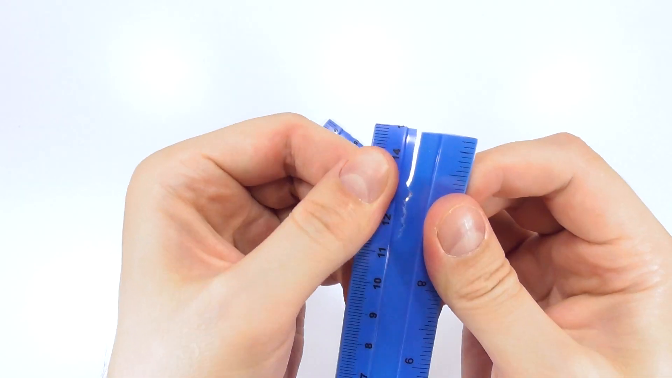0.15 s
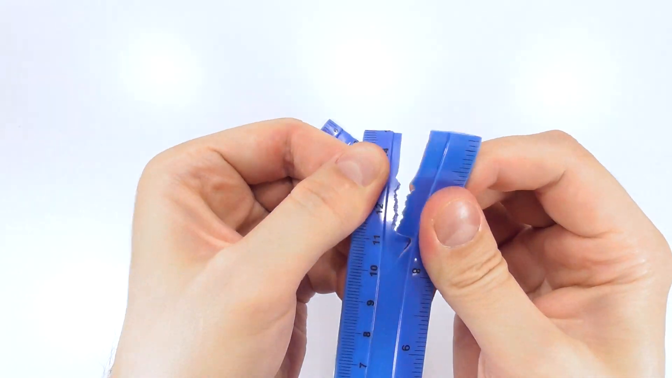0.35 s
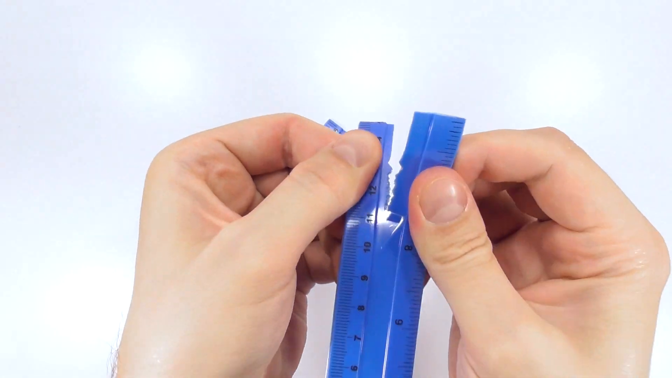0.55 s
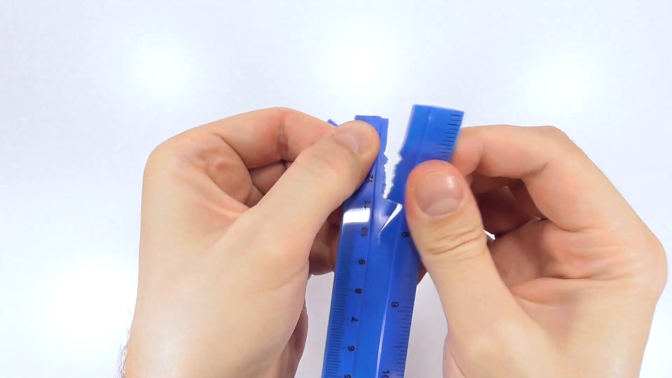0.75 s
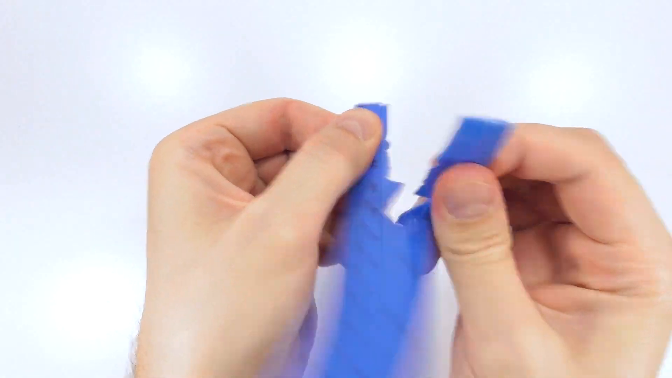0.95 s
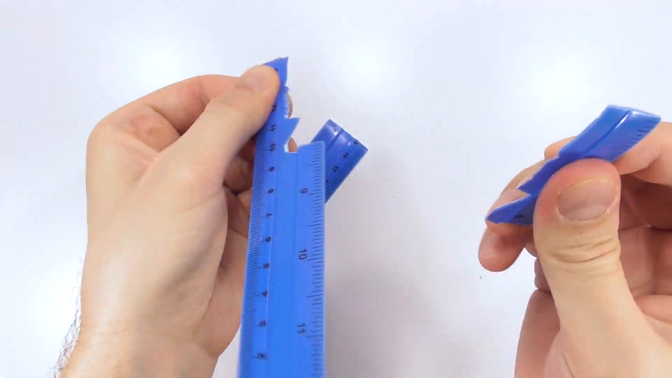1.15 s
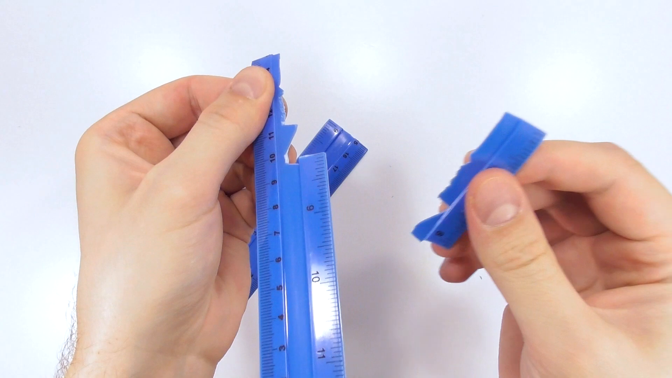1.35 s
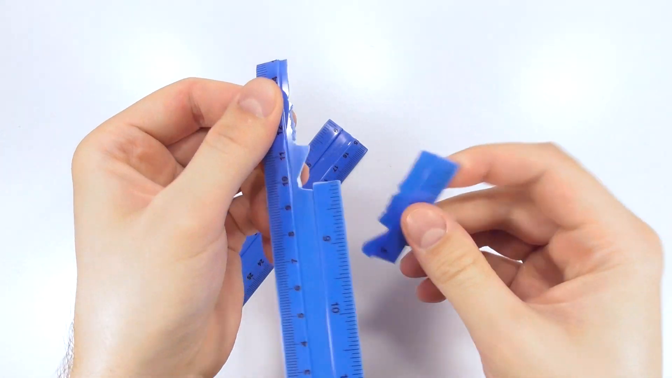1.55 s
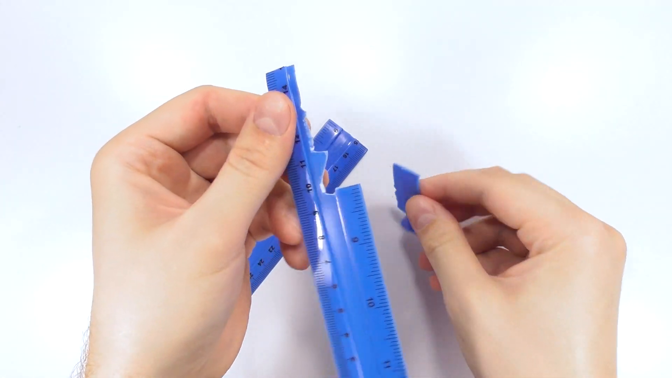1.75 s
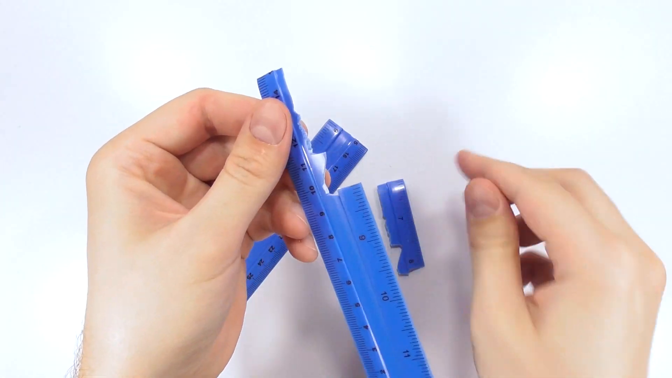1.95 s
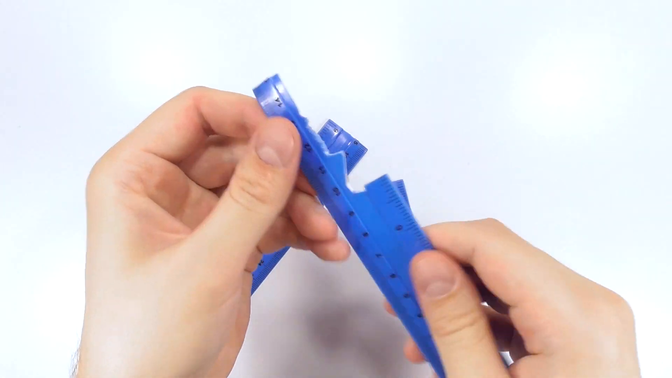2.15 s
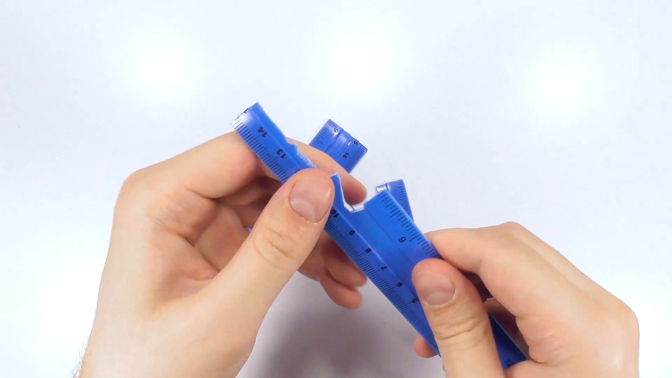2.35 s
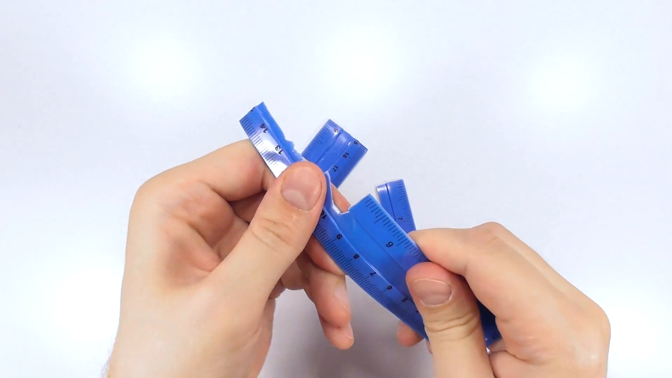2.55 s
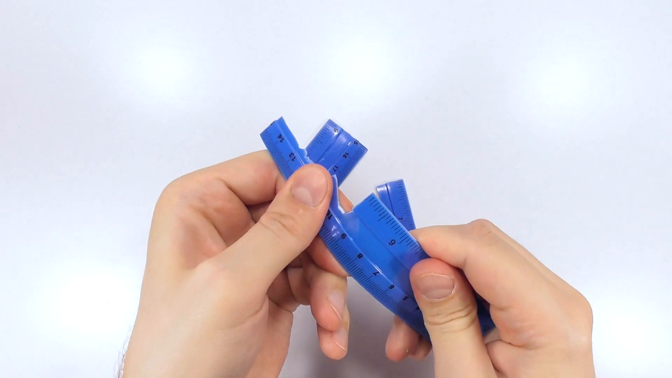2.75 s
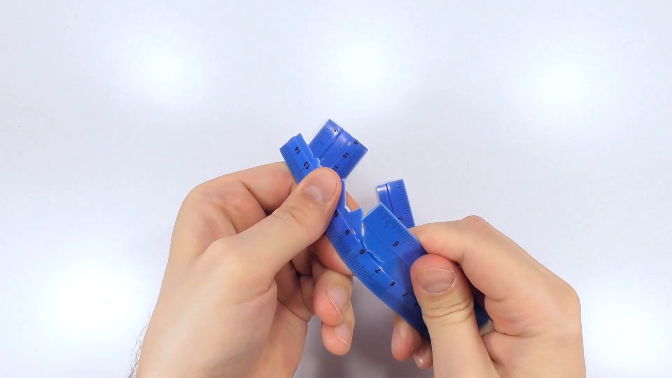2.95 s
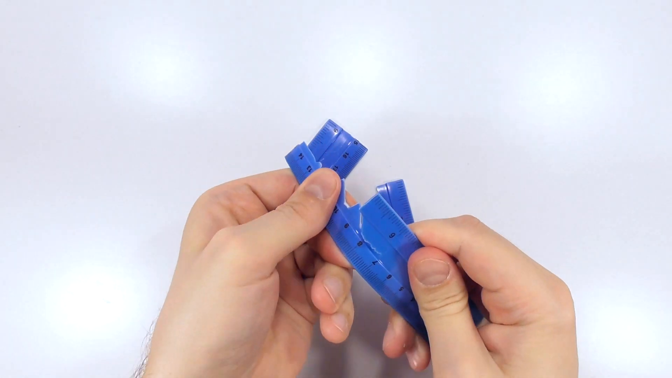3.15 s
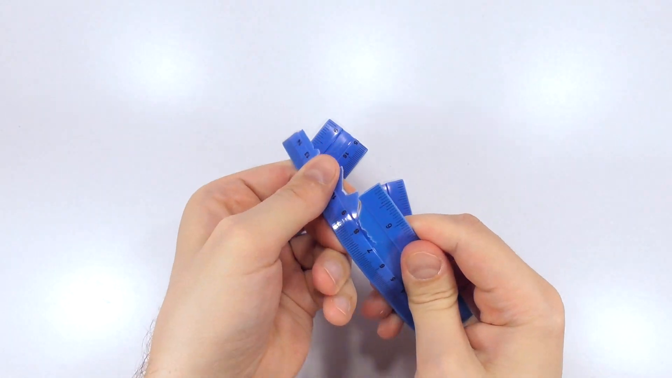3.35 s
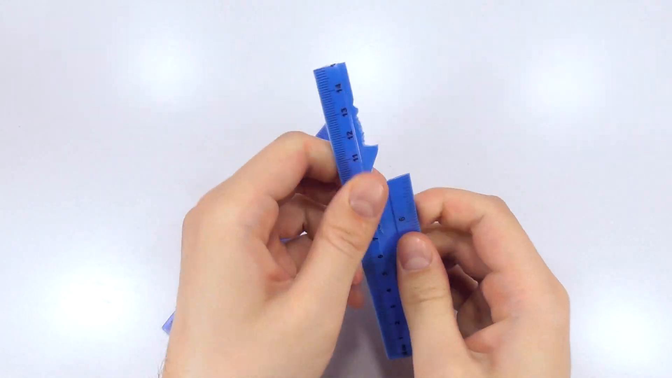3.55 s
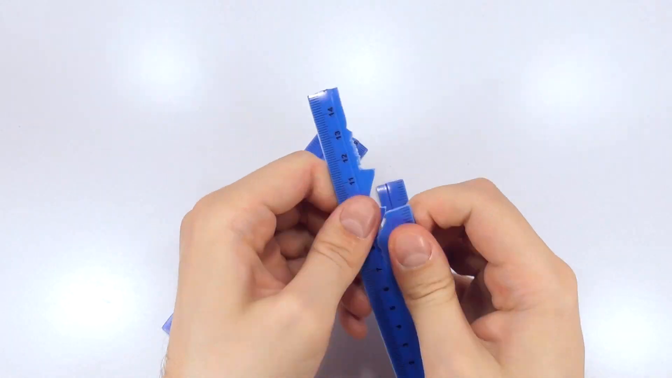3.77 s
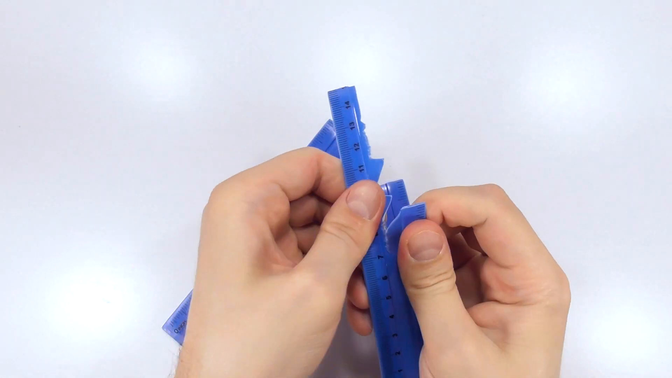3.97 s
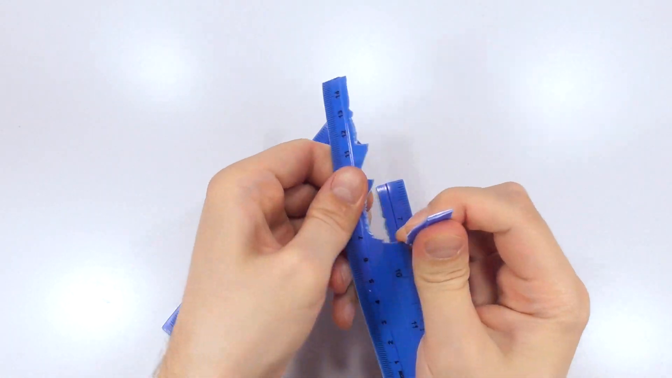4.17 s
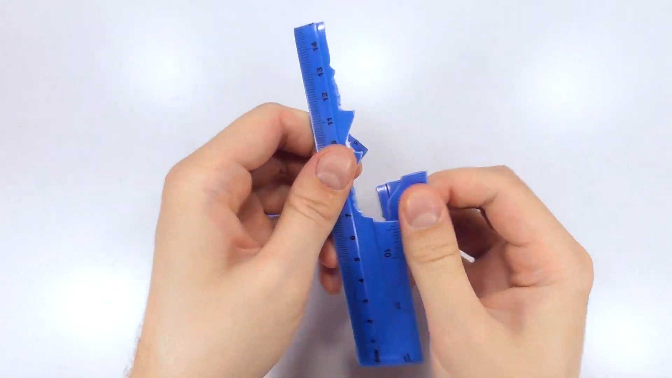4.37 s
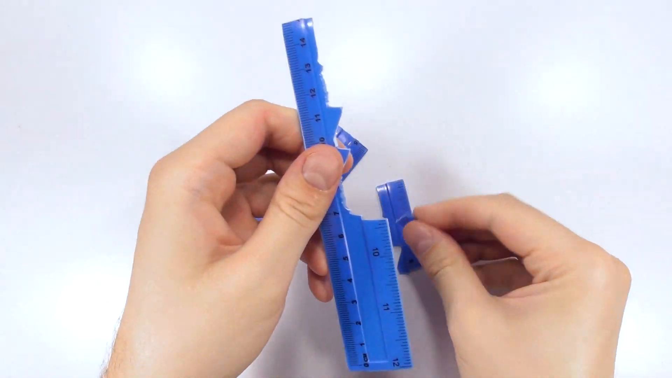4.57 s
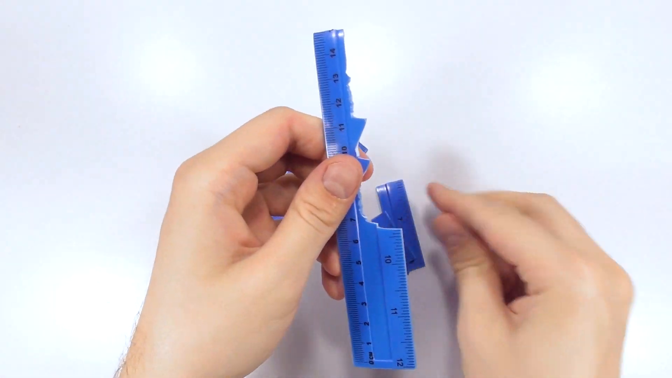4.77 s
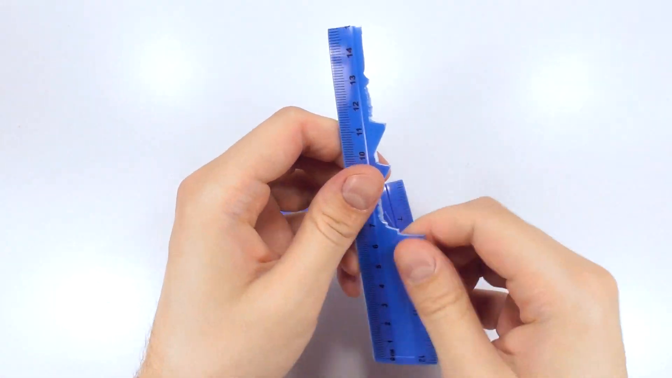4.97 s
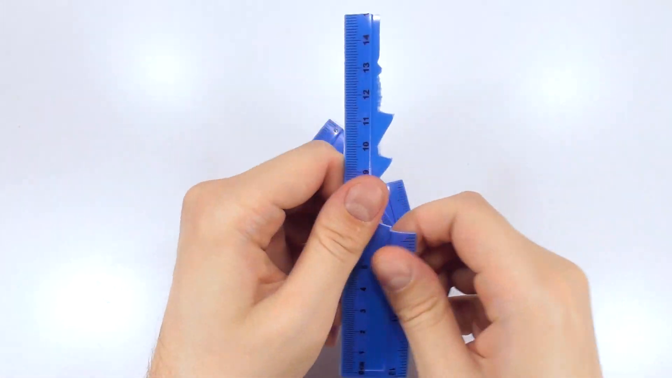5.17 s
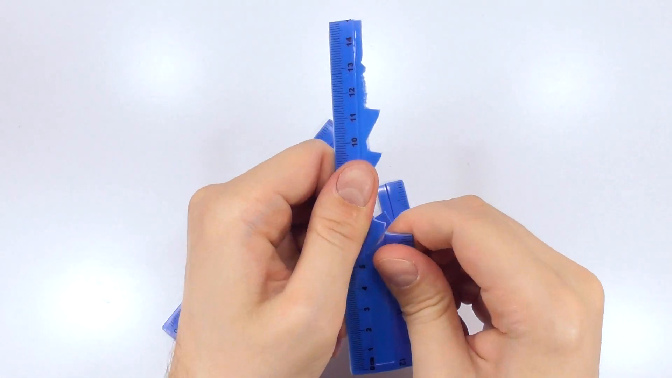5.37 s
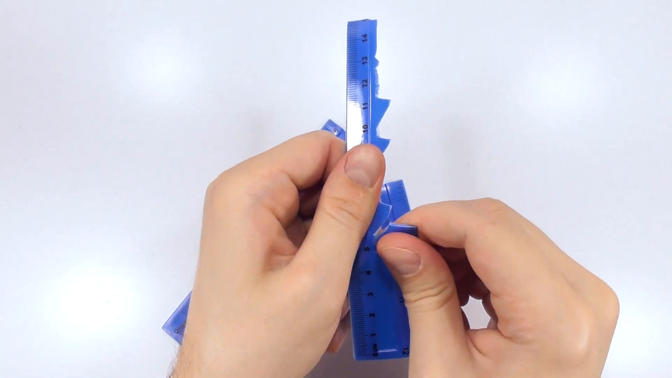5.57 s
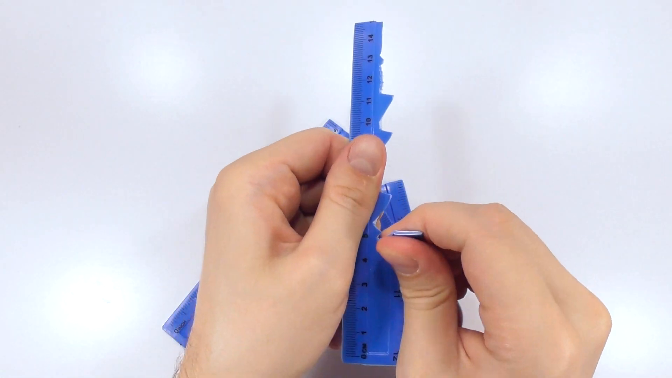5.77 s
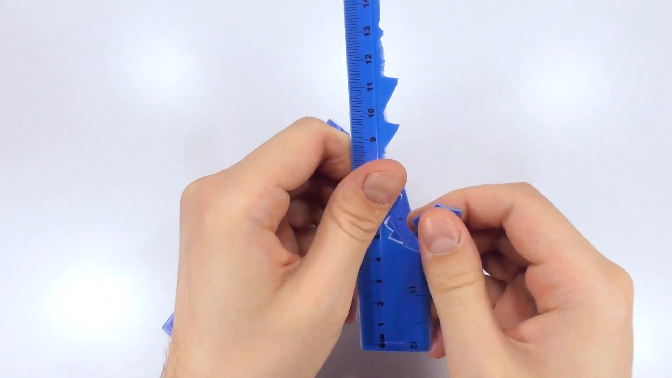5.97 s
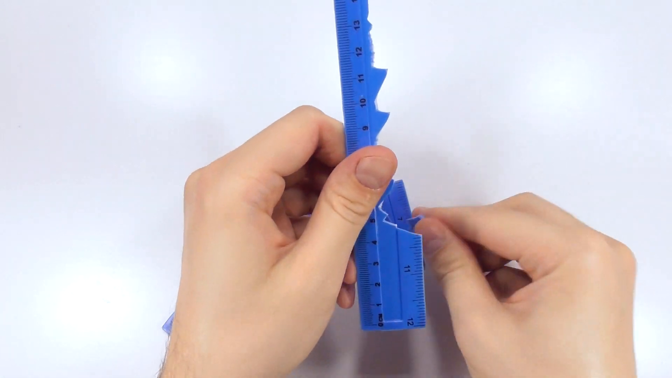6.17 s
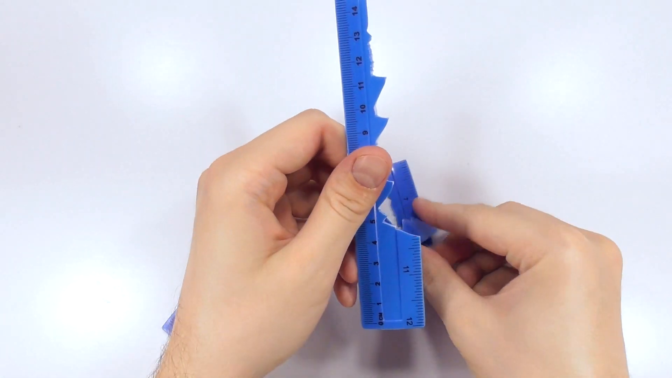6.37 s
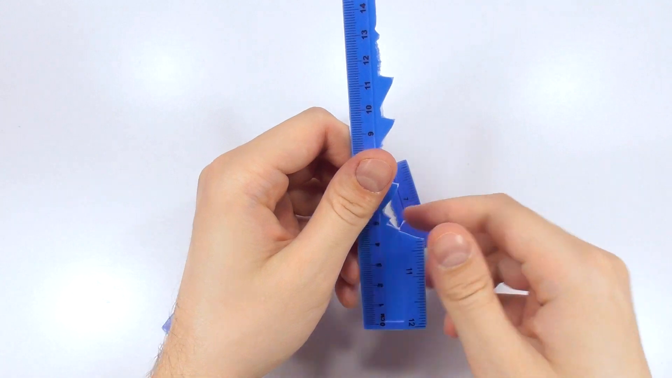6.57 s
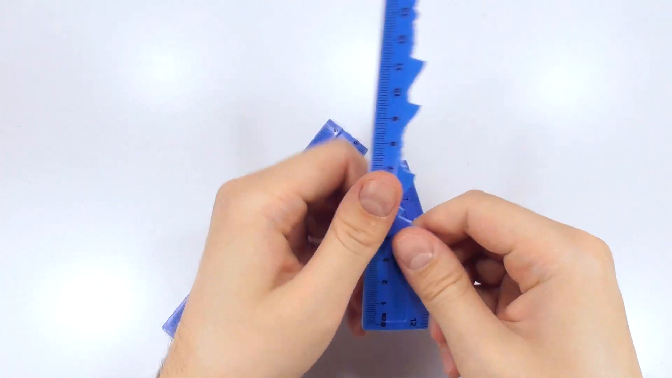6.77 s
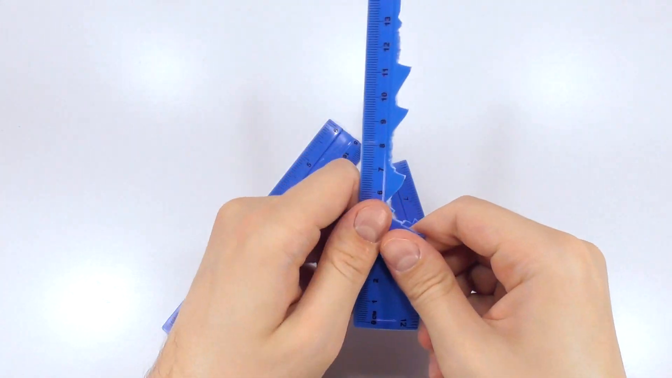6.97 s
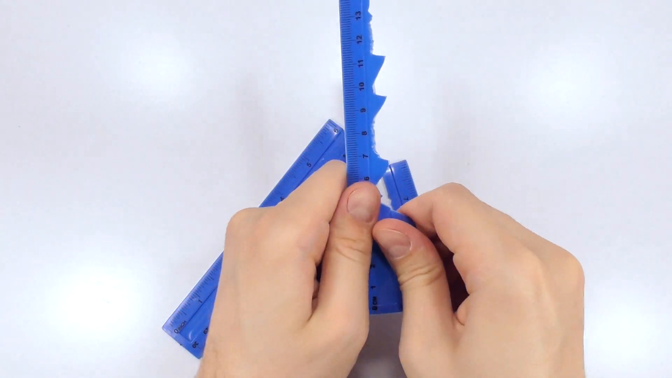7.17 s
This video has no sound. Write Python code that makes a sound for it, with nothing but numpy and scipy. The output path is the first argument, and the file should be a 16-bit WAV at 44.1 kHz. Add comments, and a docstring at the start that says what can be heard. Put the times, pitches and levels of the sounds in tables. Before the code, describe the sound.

A quiet small room with low fan hum and soft air noise, heard through a close stereo microphone. A plastic ruler breaks with dry, bright, overloading cracks at about 0.36, 0.78 and 0.96 s, the last strongest, followed at once by a sharp tick and dull low knocks near 1.0 s. Each crack carries a short puff of air and a brief diffuse room tail; the hum drops away, then swells back. Around 1.8 s a piece is set down with a woody judder, and a shard clicks and bounces. Faint ticks and finger rubs lead to a crack at 2.9 s, then gripping strokes near 3.5 s. A quick double crack comes at 4.05 and 4.09 s; tiny high shards patter at 4.7-4.8 s. Rubbing at 5 s precedes cracks at 5.4 and 5.66 s. Lighter fragments bounce at 6.3-6.45 s, and soft ticks and rubs finish near 7 s.

```python
"""Two hands bend a plastic ruler over a table and snap pieces off it, close to the microphone in a small room.
Each break is a burst of noise through resonances of the strip, with low-passed puffs of air at two ports.
Shards ring and bounce as dying sines, fingers rub as filtered grains, and the bent strip ticks.
Behind them lie coloured air noise and a fan's hum; a diffuse tail of noise answers as the room.
The cracks drive the recorder's gain control down, so the hum sinks and swells back after each."""
import sys
import numpy as np
from scipy import signal
from scipy.fft import rfft, irfft, next_fast_len
from scipy.io import wavfile
from scipy.ndimage import uniform_filter1d, minimum_filter1d

SR = 44100
rng = np.random.default_rng(int(sys.argv[2]) if len(sys.argv) > 2 else 0)


def store_wav(level_fs):
    """Save 16-bit WAV to argv[1]."""
    pcm = np.round(np.clip(np.atleast_2d(level_fs), -1, 1) * 32767)
    wavfile.write(sys.argv[1], SR, pcm.T.astype(np.int16))


N = 318402
AGE = np.arange(SR // 6) / SR   # time since a blow, s
CLICK = (AGE == 0) + 1e-18   # a single-sample impulse

# Room background with a fan's hum: hz [Hz], relative_db [dB]
AIR_COLOUR = [(15, -56), (25, -11.5), (59, -12), (99, -13), (145, 1), (256, -6), (317, -13), (607, -9.5),
              (796, -13), (1160, -16), (1650, -31.5), (2050, -27.5), (5140, -42), (8590, -29.5),
              (16000, -36.5)]
AIR_RMS_DB = -53
# Lines of the fan: hz [Hz], rms_db [dB]
FAN_LINES = [(120, -61), (183, -63), (242, -65), (366, -74), (600, -72), (948, -75), (1147, -70)]
# Likeness of noise at the two ports: hz [Hz], left_right_likeness [0 to 1]
PORT_LIKENESS = [(60, 0.14), (180, 0.89), (550, 0.29), (1650, 0.6), (4970, 0.94), (15000, 0.33)]
# Phase by which the left port leads in the treble: hz [Hz], lead [radians]
PORT_LEAD = [(9000, 0), (11000, .2), (12100, 1.0), (15000, .6)]

# The strained ruler ticks and its broken edges catch; levels before the trims in ticks():
# start_s [s], tick_db [dB], body_knock_db [dB]
TICKS = [(0.0693, -38, -66.5), (.9855, 6.5, -16), (1.4476, -41.5, -77.5), (1.728, -41.5, -70.5),
         (2.1577, -33.5, -54), (2.192, -30.5, -74), (2.4289, -45.5, -43), (3.4734, -31, -86),
         (3.4908, -34.5, -48), (3.6076, -31, -37.5), (4.998, -32.5, -43), (5.2684, -29.5, -44.5),
         (6.094, -33.5, -39.5), (6.6638, -43, -52), (6.682, -32.5, -51.5)]
# Colour of a tick: hz [Hz], relative_db [dB]
TICK_COLOUR = [(400, -20), (1000, -2), (1700, -17.5), (3300, -4), (5000, -15.5), (6500, 0.5), (8500, 3.5),
               (11000, -5), (15500, -5.5)]
# Fainter ticks come at random all the while; levels before the same trims
FAINT_TICKS_PER_S = 4
FAINT_TICK_DB, FAINT_KNOCK_DB, FAINT_SPREAD_DB = -45.5, -61, 1

# The room's answer: hz [Hz], relative_db [dB]
ROOM_COLOUR = [(200, -10.5), (1000, -6.5), (3000, -0.5), (5000, 2), (8000, -1), (10500, -2.5), (13000, -3),
               (16000, -6)]
# Dying away of the room: hz [Hz], t60_s [s]
ROOM_T60 = [(200, 0.42), (1000, 0.44), (3000, 0.36), (8000, 0.29), (11000, 0.21), (16000, 0.13)]

# Breaks of the ruler; level_db is before the trim in cracks(), the other dB are relative:
# start_s [s], level_db [dB], tear_ms [ms], crack_hz [Hz], low_flex_hz [Hz], high_flex_hz [Hz], flex_db [dB],
# room_db [dB], puff_db [dB], puff_left_right_db [dB], puff_hz [Hz], puff_low_cut_hz [Hz], swirl_db [dB]
BREAKS = [(0.3589, 21.5, 1.64, 8080, 676, 2657, -19, -6, -9, -11.5, 645, 300, -7),
          (0.7766, 16.5, 1.27, 7470, 720, 2100, -12.5, -4.5, 0.5, -18.5, 940, 130, -17.5),
          (0.9627, 30, 0.77, 10740, 1010, 3336, -12, -4.5, -14, -11, 1000, 40, -12.5),
          (2.9220, 20, 2.08, 8180, 673, 1903, -22.5, -2, -0.5, 4, 1002, 50, -10.5),
          (4.0462, 12, 2.4, 8040, 1167, 2230, -11, -2, -8, -16, 750, 50, -0.5),
          (4.0926, 19, 0.55, 8030, 503, 4730, -17, 3, 0, 6.5, 853, 40, -13),
          (5.4213, 14, 1.04, 9000, 1287, 4100, -24.5, 2, -0.5, 2.5, 618, 25, -14),
          (5.66, 20.5, 2.67, 8840, 1165, 3100, -3.5, 4.5, -1.5, -0.5, 850, 40, -13)]
# Colour of breaking plastic: hz [Hz], relative_db [dB]
FRACTURE_COLOUR = [(300, -22), (1500, -14.5), (2000, -13.5), (2700, -12.5), (4500, -13.5), (6000, -10.5),
                   (7200, -3.5), (10000, -5.5), (12000, -5), (14000, -6.5), (16000, -9.5)]

# Soft knocks of hands and pieces: start_s [s], peak_db [dB], pitch_hz [Hz], t60_s [s]
KNOCKS = [(0.983, -11, 440, 0.017), (1.036, -12.5, 75, 0.12), (1.04, -10.5, 211, 0.023),
          (1.872, -34.5, 520, .03)]
# Resonances of a piece lying on the table: pitch_hz [Hz], width_hz [Hz], relative_db [dB]
TABLE_RESONANCES = [(370, 69, 3.5), (555, 90, 12), (920, 48, 7), (1344, 74, -29), (2080, 150, -13.5),
                    (2465, 156, -22)]
SET_DOWN_S = 1.792   # a piece is set down and judders on the table

# The fingers shift their grip in runs of even strokes: start_s [s], length_s [s], strokes [count], level_db [dB]
GRIPS = [(1.754, 0.084, 1, -59), (2.164, 0.049, 1, -51), (3.469, 0.15, 2, -48), (3.589, 0.25, 3, -50.5),
         (4.315, 0.12, 1, -46.5), (5.0, 0.29, 4, -45), (6.295, 0.2, 1, -53), (6.674, 0.13, 2, -48),
         (6.883, 0.058, 1, -55.5), (7.009, 0.12, 1, -54)]
# Colour of skin on plastic: hz [Hz], relative_db [dB]
RUB_COLOUR = [(410, -16), (700, 2), (1050, 5.5), (1800, -13), (2100, -13.5), (2630, -12.5), (3460, -10),
              (4490, -22.5), (6740, -5.5), (8880, -5), (10500, -8.5), (11200, -12), (16000, -24.5)]
SLIDE_SHARE = 0.71   # share of each stroke in which the skin slides
STROKE_LOSS_DB = 4.5   # each stroke is lighter than the one before
STROKE_UNEVEN_DB, STROKE_WAVERS_PER_S = 2.5, 90   # the pressure wavers within a stroke

# The three shards that fall, a list of modes for each: pitch_hz [Hz], relative_db [dB], t60_s [s]
SHARD_MODES = [
    [(6860, -44, 0.042), (8200, -9, 0.029), (10195, 17.5, 0.025), (9840, 1, 0.034), (11600, -25, 0.011),
     (13380, -17, 0.015)],
    [(4100, -35, .06), (5900, -26, .06), (7350, -19, 0.04), (8610, -24.5, .025), (10110, 6.5, .02),
     (10130, 23, 0.033), (10700, -5, 0.0252), (11800, -10, 0.014), (13000, 12, .012), (14850, -8.5, 0.018)],
    [(7170, -34, 0.022), (8910, 7, 0.084), (9840, 18, 0.049), (10210, 13, 0.051), (11450, 2, .018),
     (13500, -24, .015), (14180, -18, 0.021)],
]
# The next shard takes over from: start_s [s]
NEXT_SHARD_S = (3, 5.5)
# Colour of a shard's clack on the table: hz [Hz], relative_db [dB]
CLACK_COLOUR = [(400, -5.5), (1200, -21.5), (2500, -21), (3700, -6.5), (5000, -19), (6300, -6.5),
                (7700, 11), (9000, 3), (12000, -8), (15500, -5.5)]
# A shard hits the table and bounces: start_s [s], ring_db [dB], clack_db [dB], other_edge_after_ms [ms],
# first_flight_s [s], ring_loss_db [dB], clack_loss_db [dB]
LANDINGS = [(1.85, -56, -30, 3, .023, 10, 18), (1.8735, -12, -22, 1.5, .077, 7.5, 19),
            (4.6915, -24, -35, 1, .0185, 9, 3), (4.7186, -13, -30, 6.5, .0268, 9.5, 6),
            (4.7665, -29, -28.5, 9, .027, 10, 6), (4.8035, -54, -31, 1, .0133, 8, 8),
            (6.2855, -44, -23.5, 6.5, .03, 1, 5), (6.373, -44, -45, 3, .036, 6, 9),
            (6.4548, -15, -30, 5.2, .0335, 10.5, 10)]
BOUNCE_RATIO = 0.56   # each flight lasts this share of the one before
LOSS_POWER = 0.73   # the loss grows with this power of the bounce number: the first bounce loses most
OTHER_EDGE_DB = -7.5   # the second edge lands softer than the first

CUTOFF_HZ = 16000   # top of the recorder's band


def from_db(db):
    """Decibels to gain."""
    return 10 ** (np.asarray(db) / 20)


def rms_one(x):
    """Scale to rms 1."""
    return x / np.sqrt(np.mean(x ** 2) + 1e-20)


def loudest_one(x, size=128):
    """Scale so that the loudest 3 ms have rms 1."""
    return x / np.sqrt(uniform_filter1d(x ** 2, size, mode="constant").max())


def at_hz(points, hz):
    """Read a table on a log-frequency axis."""
    f, value = np.transpose(points)
    return np.interp(np.log(np.maximum(hz, 1)), np.log(f), value)


def add(out, s, x):
    """Mix a sound in at a time."""
    i = max(round(s * SR), 0)
    out[..., i:i + x.shape[-1]] += x[..., :out.shape[-1] - i]


def colour(x, points):
    """Causal (minimum-phase) filter with a given spectrum, by folding the cepstrum."""
    n = 2 * next_fast_len(x.shape[-1])
    gain = from_db(at_hz(points, np.fft.rfftfreq(n, 1 / SR)))
    cepstrum = irfft(np.log(gain))
    cepstrum[1:n // 2] *= 2
    cepstrum[n // 2 + 1:] = 0
    response = np.exp(rfft(cepstrum))
    return irfft(rfft(x, n) * response)[..., :x.shape[-1]]


def resonance(x, hz, width_hz):
    """Two-pole resonance, gain about 1 on top."""
    r = np.exp(-np.pi * width_hz / SR)
    zeros = np.array([1, 0, -1]) * (1 - r * r) / 2
    poles = [1, -2 * r * np.cos(2 * np.pi * hz / SR), r * r]
    return signal.lfilter(zeros, poles, x)


def mode(hz, t60):
    """A struck mode: a dying sine."""
    return np.sin(2 * np.pi * hz * AGE) * from_db(-60 * AGE / t60)


def hold_and_fade(hold_ms, fade_ms):
    """Envelope that holds, then dies exponentially with time constant fade_ms."""
    return np.exp(-np.maximum(AGE * 1000 - hold_ms, 0) / fade_ms)


def chatter(hold_ms, fade_ms):
    """Uneven contacts that hold briefly and die, with a new colour each time."""
    return rng.standard_normal(len(AGE)) * hold_and_fade(hold_ms, fade_ms)


def stereo_noise(count):
    """White noise at two close ports, partly alike."""
    alike = np.clip(at_hz(PORT_LIKENESS, np.fft.rfftfreq(count, 1 / SR)), 0, .98)
    mid, side = rfft(rng.standard_normal((2, count)))
    shared = np.sqrt((1 + alike) / 2) * mid
    opposed = np.sqrt((1 - alike) / 2) * side * [[1], [-1]]
    return irfft(shared + opposed, count)


def background():
    """Steady air noise and the fan's lines, whose phases wander a little."""
    t = np.arange(N) / SR
    hum = np.zeros(N)
    for hz, db in FAN_LINES:
        wander = np.cumsum(rng.normal(0, .012, N))
        hum += from_db(db) * np.sqrt(2) * np.sin(2 * np.pi * hz * t + wander)
    air = rms_one(colour(stereo_noise(N), AIR_COLOUR))
    return from_db(AIR_RMS_DB) * air + hum


def faint_ticks():
    """Small slips at random times, as (start_s, tick_db, body_knock_db)."""
    count = round(FAINT_TICKS_PER_S * N / SR)
    times = rng.uniform(0, N / SR, count)
    sizes_db = FAINT_SPREAD_DB * rng.standard_normal(count)
    return [(s, FAINT_TICK_DB + db, FAINT_KNOCK_DB + db) for s, db in zip(times, sizes_db)]


def ticks(tick_db=-6, body_db=-2, body_hz=950, body_width_hz=500):
    """Short dry clicks of the hand-damped strip, with a low knock of its body."""
    out = np.zeros(N)
    for s, db, knock_db in list(TICKS) + faint_ticks():
        slip = chatter(0.82, fade_ms=3.0)
        add(out, s, from_db(db + tick_db) * loudest_one(colour(slip, TICK_COLOUR)))
        knock = loudest_one(resonance(slip, body_hz, body_width_hz))
        add(out, s, from_db(knock_db + body_db) * knock)
    return out


def ports(x, pan_db):
    """A close source at the two microphone ports: a level difference and a treble phase lead on the left."""
    lead = np.exp(1j * at_hz(PORT_LEAD, np.fft.rfftfreq(N, 1 / SR)))
    left = irfft(rfft(x) * lead, N)
    return np.array([left, x]) * from_db([[pan_db / 2], [-pan_db / 2]])


def room(x, wet_db, build_s=0.0017):
    """A diffuse tail that builds up in milliseconds and dies band by band, fastest in the treble."""
    count = SR * 2 // 3
    t, hz = np.arange(count) / SR, np.fft.rfftfreq(count, 1 / SR)
    noise, tail = rfft(stereo_noise(count)), 0
    edges = np.geomspace(100, 17000, 36)
    for low, high in zip(edges, edges[1:]):
        decay = from_db(-60 * t / at_hz(ROOM_T60, np.sqrt(low * high)))
        band = irfft(noise * ((hz >= low) & (hz < high)), count)
        tail = tail + band * decay
    build_up = 1 - np.exp(-t / build_s)
    tail = rms_one(tail * build_up) / np.sqrt(count)   # unit energy
    return from_db(wet_db) * signal.fftconvolve(x[None], colour(tail, ROOM_COLOUR), axes=1)[:, :N]


def burst(hold_ms, fade_ms):
    """A run of tiny slips or fractures that holds briefly and dies, with a nearly even spectrum."""
    shape = hold_and_fade(hold_ms, fade_ms)
    x = rng.standard_normal(len(AGE)) * shape
    for _ in range(3):   # flatten the spectrum, then restore the fade
        flat = irfft(np.exp(1j * np.angle(rfft(x))), len(AGE))
        x = flat * np.sqrt(shape)
    return loudest_one(x)


def strip(x, hz, low_hz, high_hz, flex_db, middle_flex_db):
    """The breaking strip: a bright main resonance, a low and a high flexing mode and one midway between them."""
    bright = colour(x, FRACTURE_COLOUR)
    flex_modes = [(low_hz, 520, 10),   # Hz, width Hz, relative dB
                  (np.sqrt(low_hz * high_hz), 1000, middle_flex_db),
                  (high_hz, 1000, 1)]
    flex = sum(from_db(db) * resonance(resonance(x, f, width), f, width) for f, width, db in flex_modes)
    return bright + 2.0 * resonance(bright, hz, width_hz=1300) + from_db(flex_db) * flex


def air_lobe(puff_hz, low_cut_hz):
    """One rounded pressure lobe with a slow undershoot, peak 1."""
    lobe = signal.sosfilt(signal.butter(4, puff_hz, fs=SR, output="sos"), CLICK)
    lobe = signal.lfilter(*signal.butter(1, low_cut_hz, "high", fs=SR), lobe)
    return lobe / lobe.max()


def cracks(crack_db=-11, puff_delay_s=.0006, swirl_delay_s=0.00079, far_flex_db=-6):
    """The fracture runs through the strip and rings it; the halves flick a puff of air at the ports."""
    snap, radiated, puffs = np.zeros(N), np.zeros(N), np.zeros((2, N))
    for (s, db, tear_ms, hz, low_hz, high_hz, flex_db, room_db,
         puff_db, pan_db, puff_hz, low_cut_hz, swirl_db) in BREAKS:
        tear = burst(tear_ms, fade_ms=0.89) + 0.29 * burst(0.47, fade_ms=7.0)
        near = strip(tear, hz, low_hz, high_hz, flex_db, middle_flex_db=4.5)
        add(snap, s, from_db(db + crack_db) * loudest_one(near))
        # summed over all directions, the tear excites the room like a single click
        far = strip(CLICK, hz, low_hz, high_hz, flex_db + far_flex_db, middle_flex_db=-3.5)
        add(radiated, s, from_db(db + crack_db + room_db) * loudest_one(far))
        # the puff is stronger at the port that it meets
        lobe = air_lobe(puff_hz, low_cut_hz)
        port_db = np.minimum([[pan_db], [-pan_db]], 0)
        add(puffs, s + puff_delay_s, from_db(db + puff_db + port_db) * lobe)
        # the swirl behind it pushes on one port and pulls on the other
        swirl = lobe * [[1], [-1]]
        add(puffs, s + puff_delay_s + swirl_delay_s, from_db(db + swirl_db) * swirl)
    return snap, radiated, puffs


def knocks(judder_db=-37):
    """Dull, quickly damped blows as dying sines, and the judder of the piece set down."""
    out = np.zeros(N)
    for s, db, hz, t60 in KNOCKS:
        add(out, s, from_db(db) * mode(hz, t60))
    contacts = chatter(1.3, fade_ms=8.5) + 0.21 * chatter(74, fade_ms=16)
    judder = sum(from_db(db) * resonance(contacts, hz, width) for hz, width, db in TABLE_RESONANCES)
    add(out, SET_DOWN_S, from_db(judder_db) * loudest_one(judder))
    return out


def finger_pressure():
    """Each change of grip is a run of strokes that swell, waver and lift, lighter every time."""
    pressure = np.zeros(N)
    for s, length_s, strokes, db in GRIPS:
        count = max(round(strokes), 1)
        stroke_s = length_s / count
        slide = signal.windows.tukey(int(SLIDE_SHARE * stroke_s * SR), .5)
        for k in range(count):
            add(pressure, s + k * stroke_s, from_db(db - k * STROKE_LOSS_DB) * slide)
    knots = np.arange(0, N, SR / STROKE_WAVERS_PER_S)
    waver = np.interp(np.arange(N), knots, rng.standard_normal(len(knots)))
    return pressure * from_db(STROKE_UNEVEN_DB * waver)


def rubbing(slips_per_s=1000, grain_db=3.5, ring_share=3.2, ring_width_hz=220):
    """Skin sticks and slips on the plastic: uneven grains under each stroke ring the strip."""
    slip_now = rng.random(N) < slips_per_s / SR
    sizes = from_db(grain_db * np.minimum(rng.exponential(1, N), 4))
    slips = slip_now * rng.choice([-1, 1], N) * sizes
    ring = sum(resonance(slips, hz, ring_width_hz) for hz in (2190, 3100, 3600, 5817, 7290, 8440))
    return finger_pressure() * rms_one(colour(slips + ring_share * ring, RUB_COLOUR))


def touches(count=5):
    """Contacts as (start_s, ring_db, clack_db): two edges land, then ever shorter, weaker bounces follow."""
    rows = []
    for s, ring_db, clack_db, edge_ms, flight_s, ring_loss_db, clack_loss_db in LANDINGS:
        other_edge_s = s + edge_ms / 1000
        rows.append((other_edge_s, ring_db + OTHER_EDGE_DB, clack_db + OTHER_EDGE_DB))
        for k in range(count):
            spent = k ** LOSS_POWER
            rows.append((s, ring_db - ring_loss_db * spent, clack_db - clack_loss_db * spent))
            s = s + flight_s * BOUNCE_RATIO ** k
    return rows


def shards(edge_db=-9, chatter_ms=2.6, detune=0.007, mode_spread_db=2.18):
    """A shard lands on its edges with a quick chatter that rings its modes, a little differently each time."""
    out = np.zeros(N)
    for s, ring_db, clack_db in touches():
        body = np.zeros(len(AGE))
        for hz, db, t60 in SHARD_MODES[np.searchsorted(NEXT_SHARD_S, s)]:
            gain = from_db(db + rng.normal(0, mode_spread_db))
            body += gain * mode(hz * (1 + detune * rng.normal()), t60)
        strike = burst(chatter_ms, fade_ms=0.394)
        ring = loudest_one(signal.fftconvolve(strike, body)[:len(AGE)])
        # the hard edge adds a broad treble spit
        spit = resonance(chatter(chatter_ms, fade_ms=8.3), 11000, 4000)
        edge = loudest_one(resonance(spit, 11000, 4000))
        clack = loudest_one(colour(chatter(chatter_ms, fade_ms=2.6), CLACK_COLOUR))
        add(out, s, from_db(ring_db) * (ring + from_db(edge_db) * edge) + from_db(clack_db) * clack)
    return out


def scene():
    """Ruler and hands sit slightly right, the shards a little more so; the puffs reach only the microphone."""
    snap, radiated, puffs = cracks()
    fallen = shards()
    handling = ticks() + knocks() + rubbing()
    direct = ports(snap + handling, pan_db=-1.4) + ports(fallen, pan_db=-2.0)
    answer = room(radiated + handling, wet_db=-17.5) + room(fallen, wet_db=-15)
    return direct + puffs + answer + background()


def gain_control(x, ceiling_db=-0.5, release_db_per_s=36, size=16):
    """The shared gain drops around an overload, starting just ahead of it, and creeps back at a steady dB rate."""
    power = uniform_filter1d(x ** 2, size, axis=1).max(0)   # the louder port counts
    level_db = 10 * np.log10(np.maximum(power, 1e-12))
    ramp = release_db_per_s * np.arange(N) / SR
    cut_db = np.maximum.accumulate(np.maximum(level_db - ceiling_db, 0) + ramp) - ramp
    # widen each drop a little and round its corners
    gain_db = uniform_filter1d(minimum_filter1d(-cut_db, 10 * size), 2 * size)
    return x * from_db(gain_db)


def record(dry):
    """Gain control, clipping at full scale, and the top cut off."""
    clipped = np.clip(gain_control(dry), -1, 1)
    return signal.sosfilt(signal.ellip(8, .1, 70, CUTOFF_HZ, fs=SR, output="sos"), clipped)


dry = scene()
out = record(dry)
store_wav(out)
```